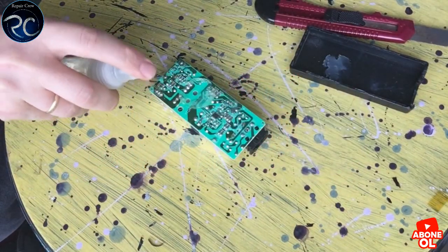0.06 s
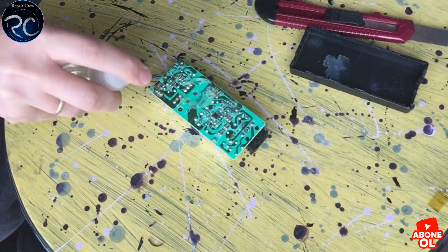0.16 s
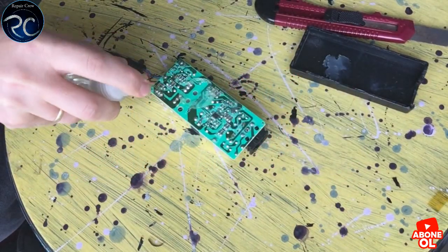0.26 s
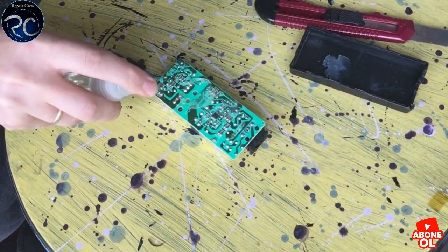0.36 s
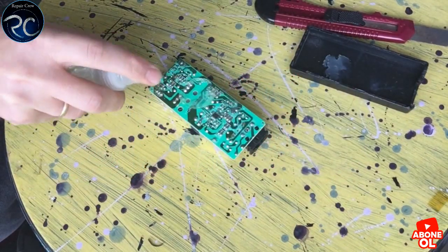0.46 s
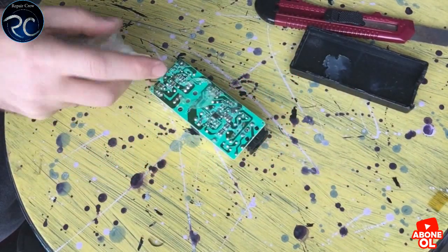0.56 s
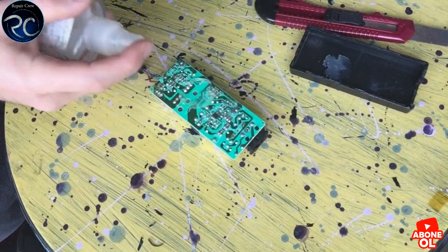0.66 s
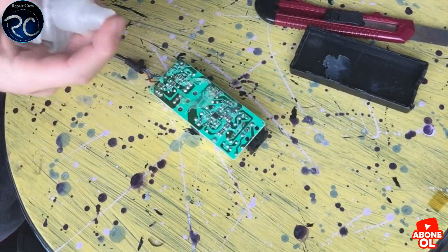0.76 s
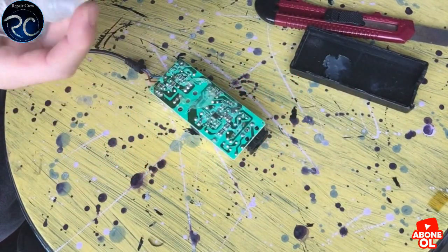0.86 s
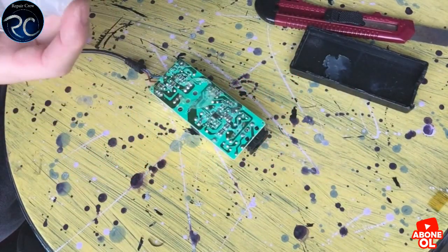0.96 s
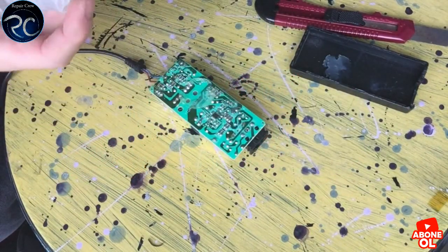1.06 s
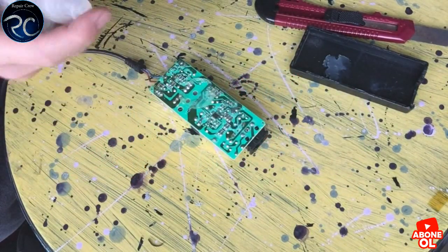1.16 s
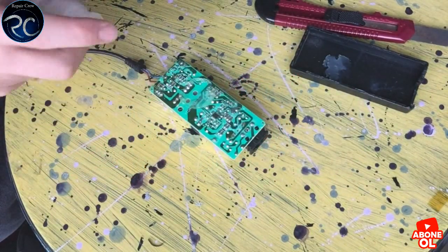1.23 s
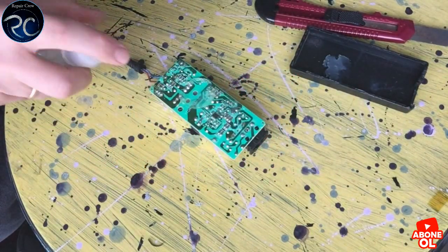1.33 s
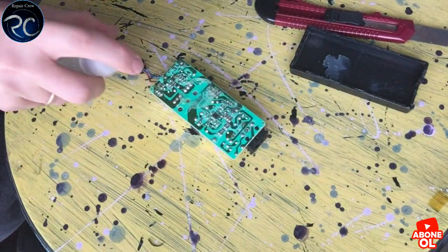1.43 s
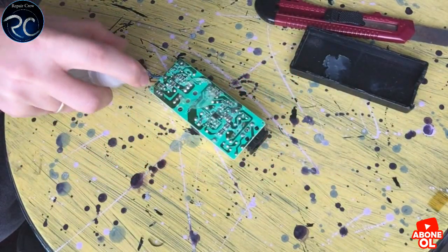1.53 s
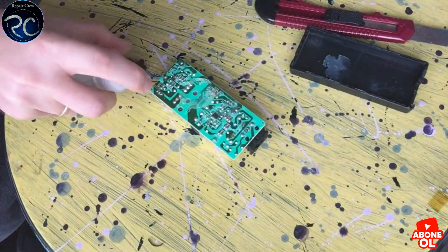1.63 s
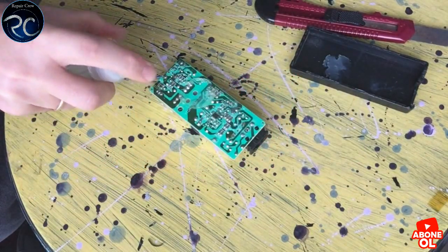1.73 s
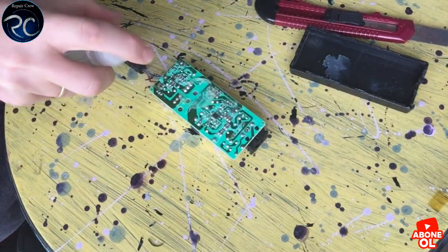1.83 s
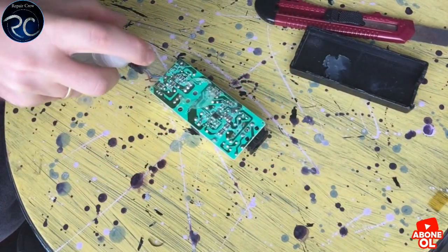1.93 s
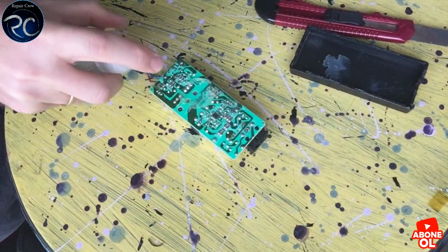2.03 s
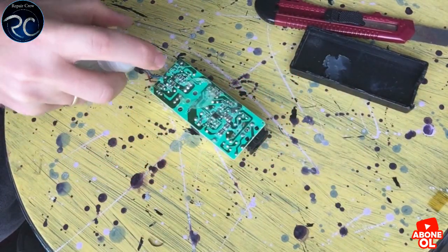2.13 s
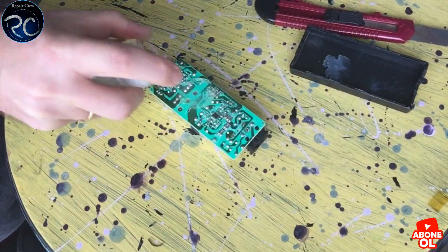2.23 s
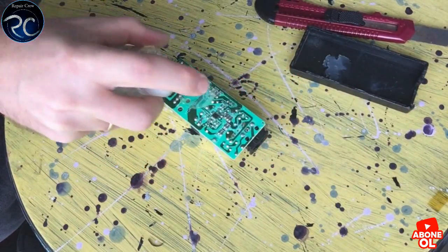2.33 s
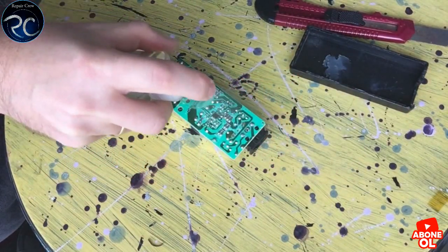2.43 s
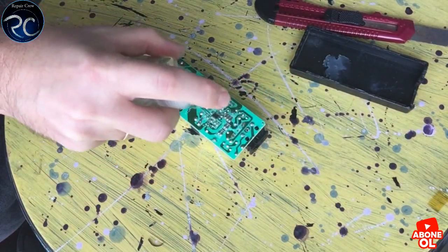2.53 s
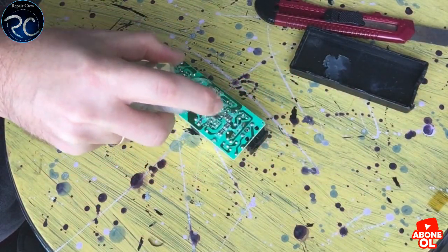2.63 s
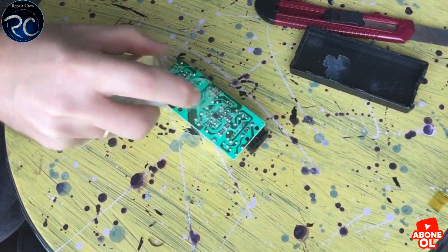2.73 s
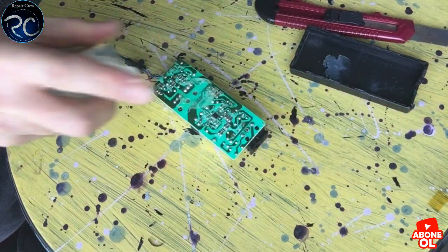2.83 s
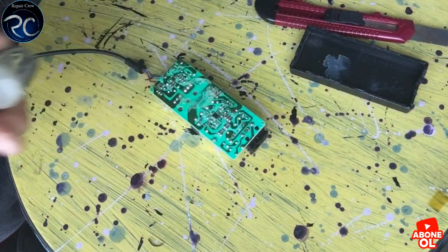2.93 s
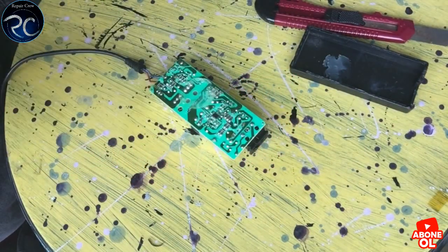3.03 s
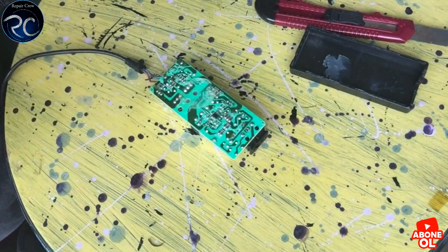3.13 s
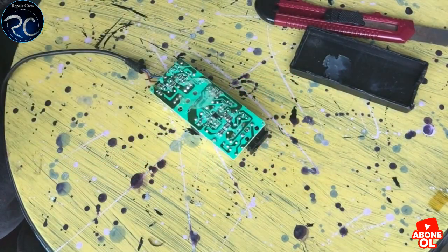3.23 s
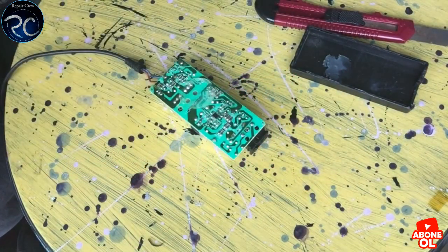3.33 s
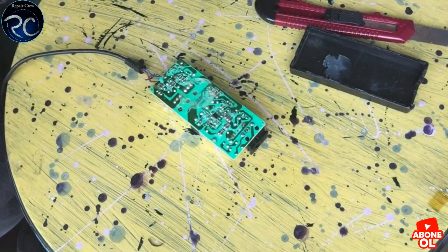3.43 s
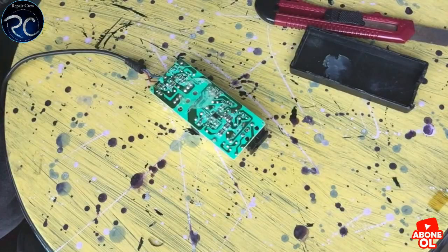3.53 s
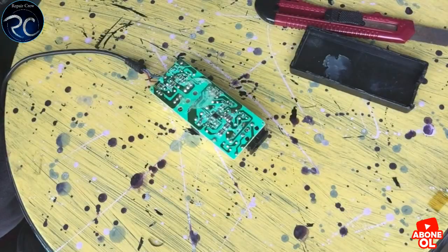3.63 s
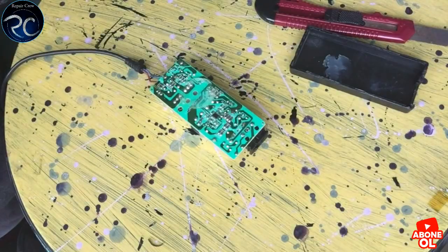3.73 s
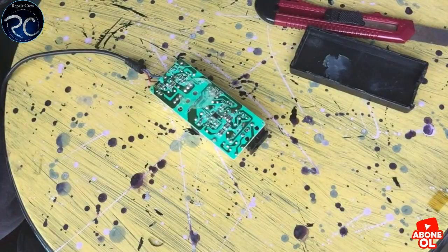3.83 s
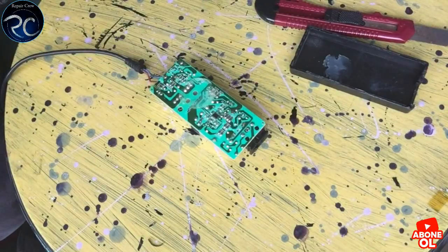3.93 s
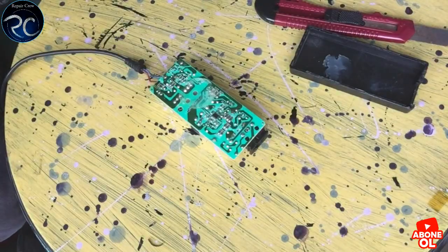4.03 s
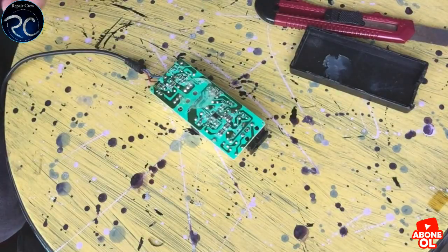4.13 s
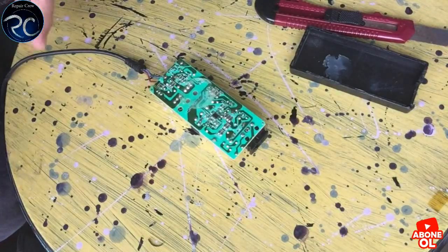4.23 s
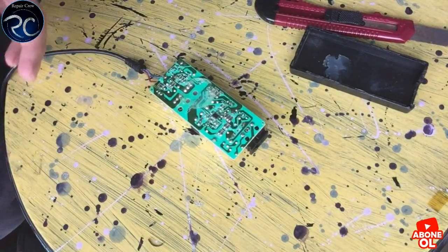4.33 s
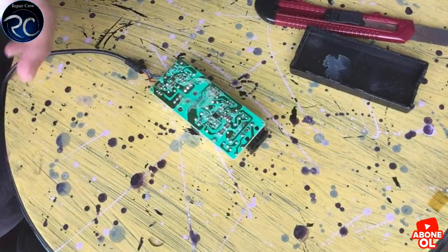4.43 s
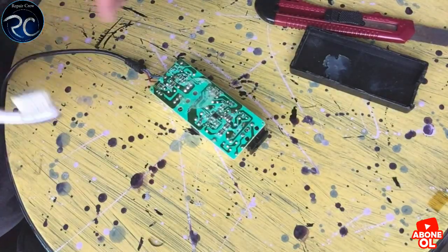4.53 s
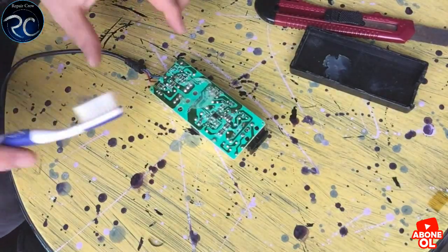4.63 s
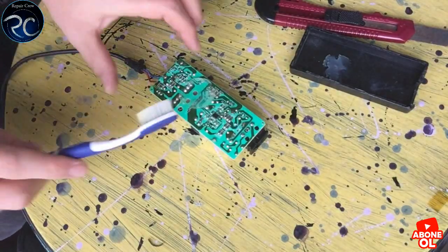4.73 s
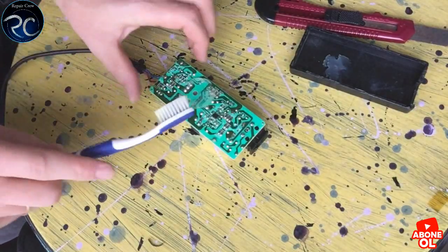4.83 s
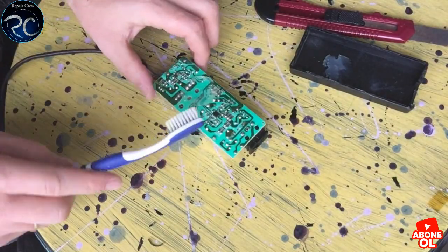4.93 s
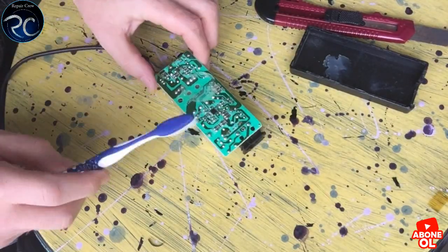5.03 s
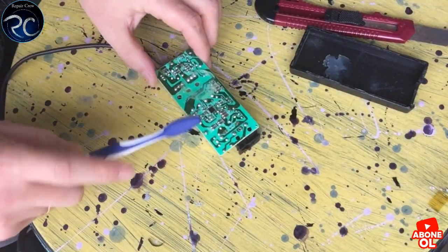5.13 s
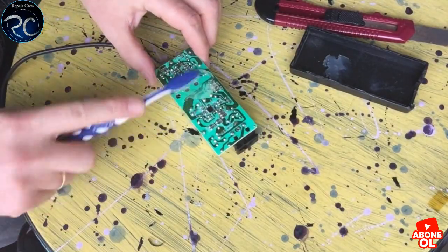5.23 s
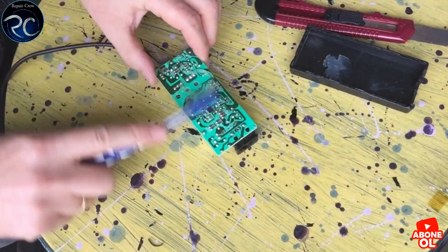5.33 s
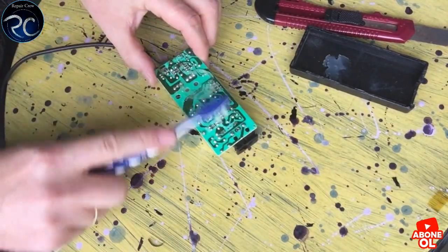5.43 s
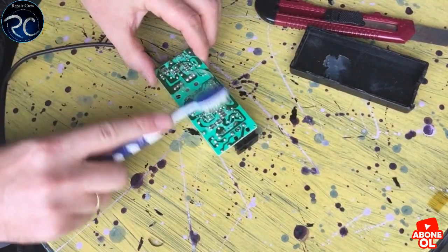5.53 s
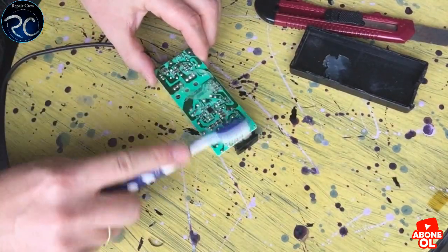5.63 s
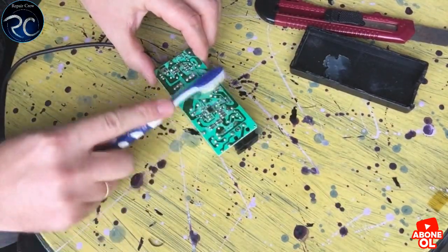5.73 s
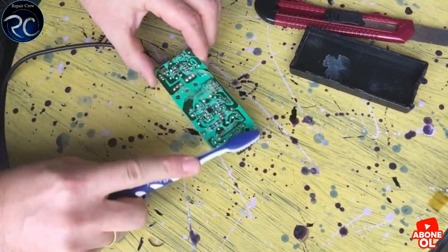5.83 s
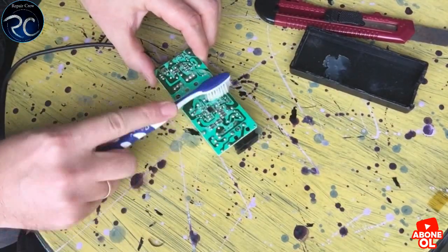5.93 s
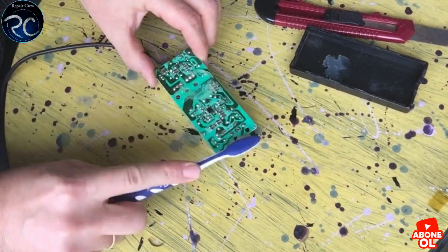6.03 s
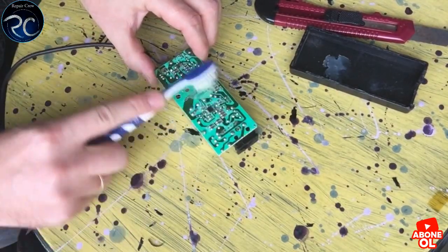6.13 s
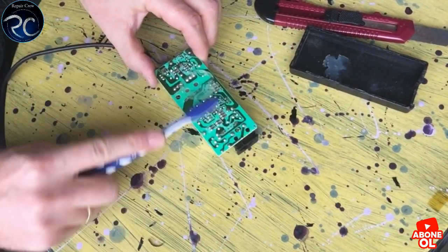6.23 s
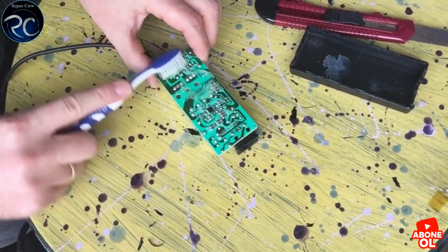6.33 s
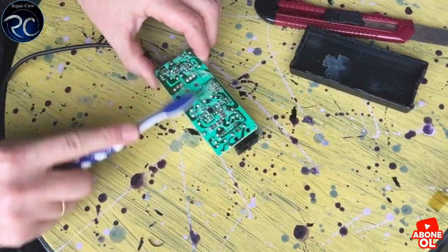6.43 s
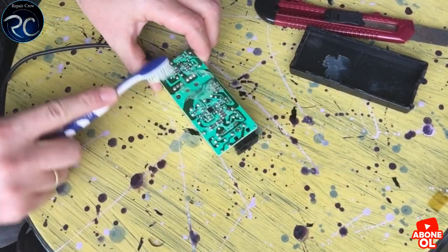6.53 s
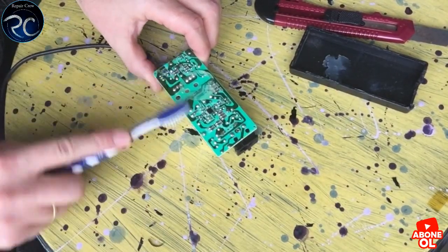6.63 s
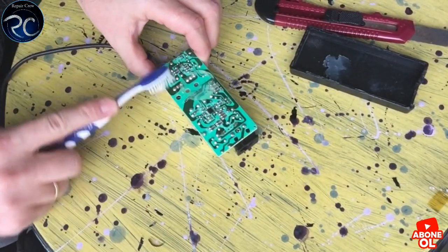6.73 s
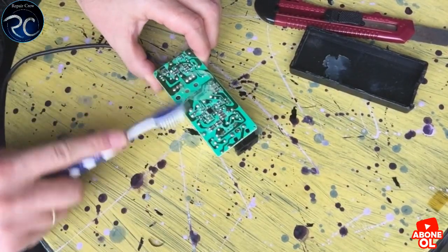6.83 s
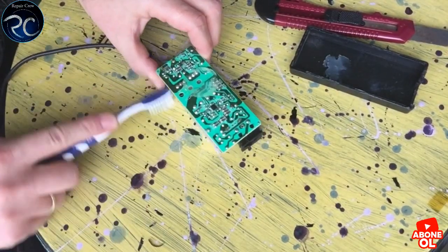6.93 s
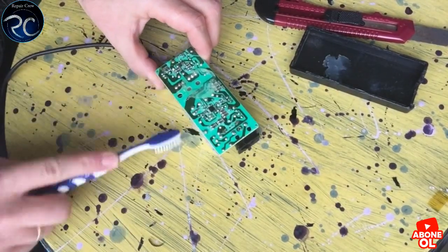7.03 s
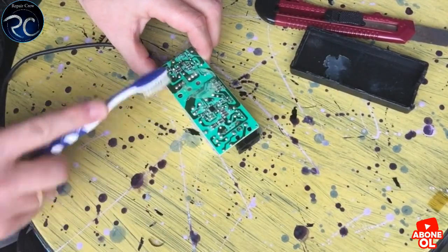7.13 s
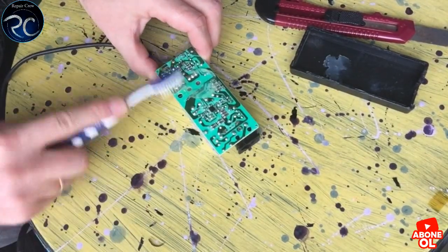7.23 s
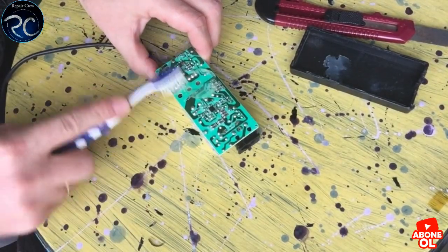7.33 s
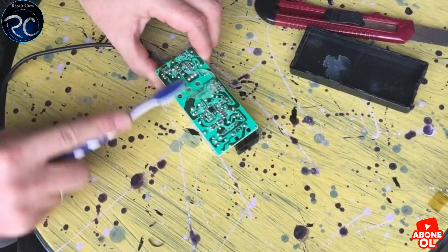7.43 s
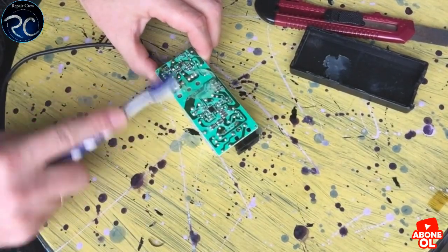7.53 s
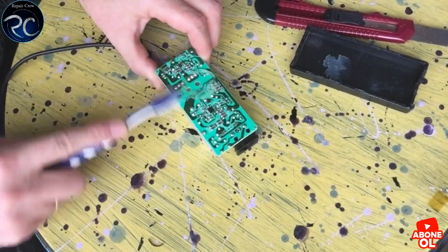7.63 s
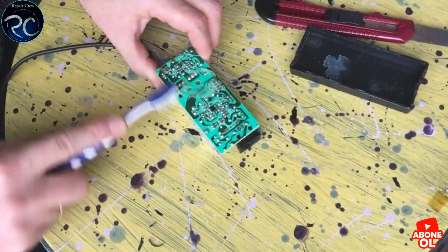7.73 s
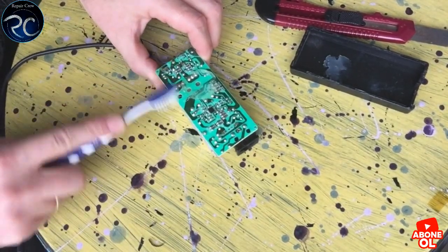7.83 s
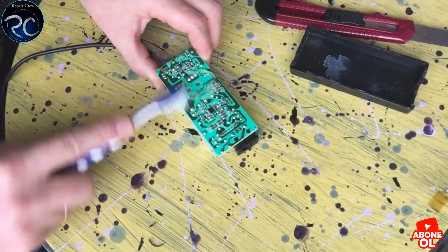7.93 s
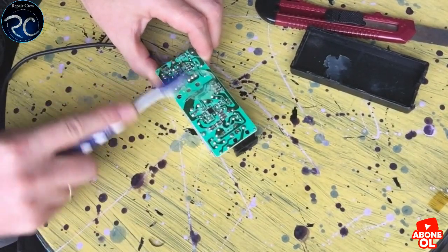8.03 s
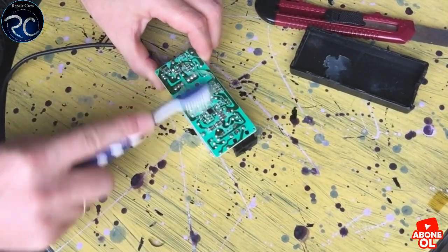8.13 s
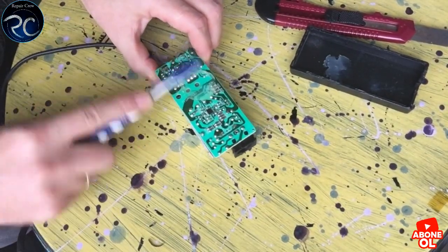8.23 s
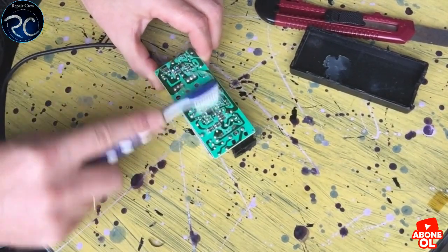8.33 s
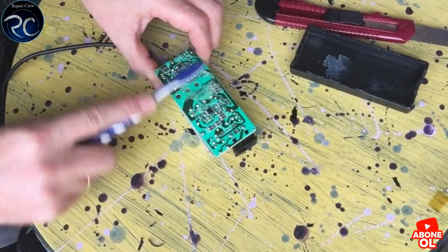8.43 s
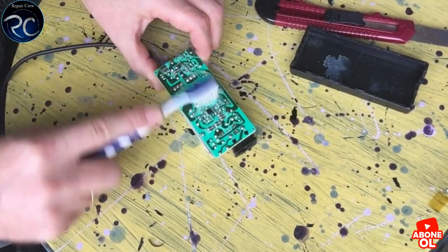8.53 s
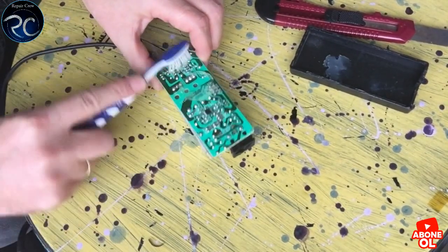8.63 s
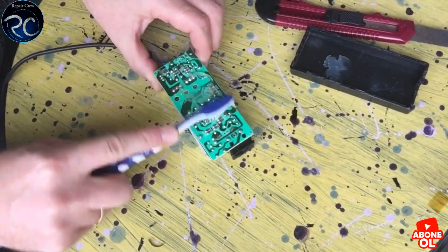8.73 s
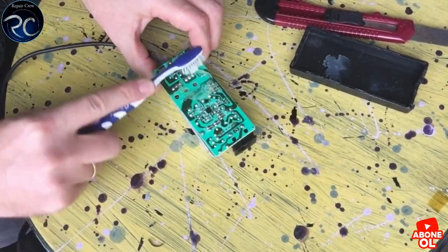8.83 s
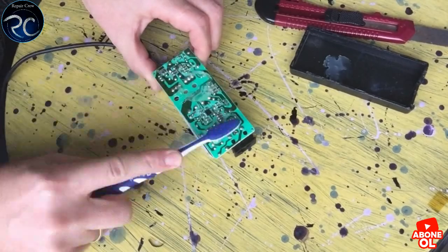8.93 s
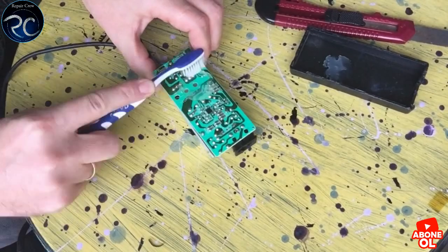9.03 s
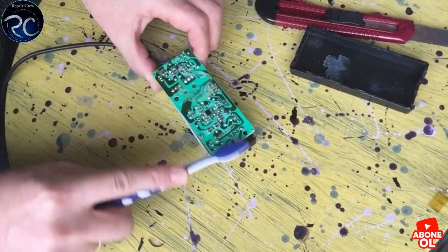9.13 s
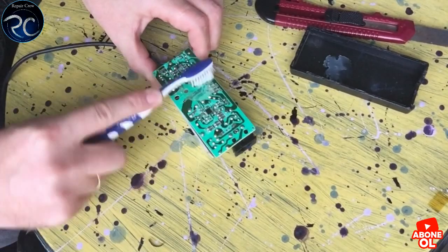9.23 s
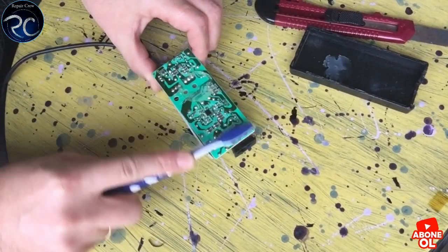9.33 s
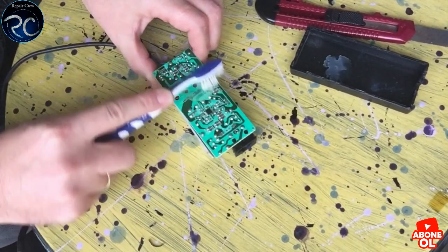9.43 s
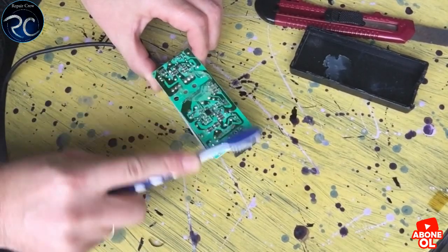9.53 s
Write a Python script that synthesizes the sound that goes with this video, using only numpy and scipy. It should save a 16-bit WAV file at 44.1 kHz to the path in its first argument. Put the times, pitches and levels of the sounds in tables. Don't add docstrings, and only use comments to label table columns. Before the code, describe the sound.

A small quiet room with faint unsteady hum, soft air noise and barely audible ticks, heard by a phone microphone close to a wooden bench. From 0.1 to 0.4 s a plastic spray pump clicks faintly with one short puff. Sparse tiny clicks follow; from 1.4 to 2.8 s they thicken, with wall crackle and five brief mist puffs, ending in a sharper tap on the board at 2.8 s. Near silence, then the bottle lands with a low woody thud at 3.9 s. At 4.9 s a brush is laid down and dragged. From 5.3 s it scrubs rapidly, about ten scratchy strokes a second, with tufts snapping and the board knocking, until a clattering skid around 6.9 s. After a short gap, a firmer bout runs from 7.2 s to the end at about 9.5 s, with hard slaps at 7.7 and 8.2 s and the loudest crack at 8.6 s.

```python
import sys
import numpy as np
from scipy import signal
from scipy.fft import rfft, irfft, next_fast_len
from scipy.io import wavfile
from scipy.ndimage import uniform_filter1d, map_coordinates

SR = 44100
rng = np.random.default_rng(int(sys.argv[2]) if len(sys.argv) > 2 else 0)


def level_to_linear(level):
    exponent = np.asarray(level, float) / 20
    return 10 ** exponent


def to_wav(sig):
    pcm = np.clip(np.atleast_2d(sig), -1, 1) * 32767
    pcm = np.round(pcm).astype(np.int16)
    wavfile.write(sys.argv[1], SR, pcm.T)


N = 422037

# start_s, speed_db, board_flex_db, bench_load_db
PLACING = [
    (4.906, -49.0, -44.0, -36.5),
    (5.04, -68.5, -59.5, -46.5),
]
# turn_s, speed_db, board_flex_db, bench_load_db
FIRST_BOUT = [(5.294, -45.0, -65.0, -43.5), (5.401, -43.5, -48.5, -48.0), (5.516, -41.5, -46.0, -39.5),
              (5.624, -50.0, -51.0, -44.5), (5.737, -46.0, -44.0, -49.5), (5.845, -48.5, -49.0, -44.0),
              (5.96, -41.5, -42.0, -40.5), (6.05, -46.0, -47.0, -48.5), (6.196, -43.0, -63.5, -40.5),
              (6.255, -45.0, -45.5, -45.5), (6.375, -45.5, -59.0, -42.5), (6.48, -44.0, -43.5, -39.0),
              (6.587, -45.5, -42.0, -49.0), (6.68, -44.0, -58.5, -39.0), (6.78, -41.0, -40.5, -41.5),
              (6.938, -54.0, -44.0, -46.5)]
# frequency_hz, level_db (per Hz)
SCRATCH = [(600, -79), (900, -19.5), (1100, -10), (1300, -12), (1650, -4.5), (2050, -3.5), (2300, -6.5),
           (2750, 3), (3200, -9), (3800, -14.5), (4400, -28.5), (4900, -26.5), (5600, -31), (6700, -41.5)]
# frequency_hz, width_hz, level_db
PLATE = [(2092, 64, -1.5), (2713, 110, 5), (2966, 30, -1.5), (1763, 75, 6), (1432, 20, 3.5)]
# frequency_hz, level_db (per Hz)
WOOD = [(65, -41), (110, -13), (150, -12.5), (194, 5.5), (226, -6), (258, -2), (290, -14), (352, -15),
        (404, -19.5), (520, -27.5), (680, -39), (1140, -120)]
# frequency_hz, level_db (per Hz)
PLASTIC = [(500, -69), (900, -10), (1400, -19.5), (1750, -5.5), (2250, -13), (2650, -1), (3100, -6.5),
           (3600, -13), (4300, -25), (5200, -23.5), (6500, -73), (8500, -49), (11000, -99)]


def unit(x):
    return x / np.sqrt(np.mean(x ** 2) + 1e-20)


def colour(points):
    f, db = np.transpose(points)
    grid = np.fft.rfftfreq(2 ** 14, 1 / SR)
    gain = level_to_linear(np.interp(np.log(grid + 1), np.log(f + 1), db))
    cep = irfft(np.log(np.maximum(gain, 1e-5)))
    cep[1:len(cep) // 2] *= 2
    cep[len(cep) // 2 + 1:] = 0
    kernel = irfft(np.exp(rfft(cep)))
    return lambda hz: rfft(kernel, 2 * len(hz) - 2)


def modes(table):
    def response(f):
        total = 0
        for k, (centre, width, db) in enumerate(table):
            damping = 1j * f * width
            total = total + (-1) ** k * level_to_linear(db) * damping / (centre * centre - f * f + damping)
        return total
    return response


def lifted(table):
    return lambda hz: 1 + modes(table)(hz)


def favoured(centre_hz, width_hz, lift_db):
    return lifted([(centre_hz[:, None], width_hz, lift_db)])


def filtered(x, *responses):
    n = x.shape[-1]
    m = 2 * next_fast_len(n // 2 + 1536)
    spectrum = rfft(x, m)
    for response in responses:
        spectrum = spectrum * response(np.fft.rfftfreq(m, 1 / SR))
    return irfft(spectrum, m)[..., :n]


def wobble(rate):
    knots = rng.standard_normal(int(N * rate / SR) + 4)
    return map_coordinates(knots, [np.arange(N) * rate / SR])


def grit(per_second, spread_db):
    there = rng.random(N) < per_second / SR
    return there * level_to_linear(spread_db * rng.exponential(size=N)) * rng.standard_normal(N)


def patchy(x, depth_db):
    z = signal.stft(x, nperseg=512)[2]
    field = uniform_filter1d(rng.standard_normal(z.shape), size=4, axis=0)
    field = uniform_filter1d(field, size=6, axis=1)
    return signal.istft(z * level_to_linear(depth_db * unit(field)), nperseg=512)[1][:N]


def strikes(times, peak_db, t60, spike, rise, *responses):
    t = np.arange(SR // 6) / SR
    rattle = level_to_linear(-60 * t / np.clip(t60, .01, .4)[:, None])
    shape = (1 - np.exp(-t / rise)) * (rattle + spike * level_to_linear(-60 * t / 0.0061))
    rings = filtered(shape * rng.standard_normal(shape.shape), *responses)
    rings *= (level_to_linear(peak_db) / np.abs(rings).max(axis=1))[:, None]
    at = np.round(times * SR).astype(int)[:, None] + np.arange(len(t))
    return np.bincount(at.ravel(), rings.ravel(), N + SR)[:N]


def brush():
    # turn_s, speed_db, board_flex_db, bench_load_db
    second_bout = [(7.205, -46.0, -58.0, -36.0), (7.303, -43.5, -62.5, -47.0), (7.398, -42.5, -54.5, -39.5),
                   (7.494, -42.5, -44.5, -39.5), (7.59, -41.5, -50.5, -34.5), (7.687, -39.0, -39.0, -40.5),
                   (7.797, -46.0, -54.5, -51.0), (7.892, -43.0, -54.0, -39.5), (8.005, -42.5, -41.5, -46.5),
                   (8.097, -42.0, -59.5, -43.5), (8.203, -39.5, -55.0, -55.5), (8.314, -41.5, -44.5, -37.5),
                   (8.415, -41.5, -48.0, -46.5), (8.508, -42.0, -50.5, -40.0), (8.618, -36.5, -51.5, -45),
                   (8.732, -50.5, -53.0, -48.0), (8.843, -40.0, -47.0, -48.0), (8.95, -45.5, -54.0, -39.0),
                   (9.048, -41.0, -45.0, -42.0), (9.156, -46.5, -55.0, -48.0), (9.258, -43.5, -54.5, -50.5),
                   (9.354, -46.0, -57.0, -45.5), (9.47, -40.0, -47.5, -44.0)]
    # frequency_hz, level_db (per Hz)
    hiss_colour = [(4500, -71), (6300, -14), (7000, -8), (7600, 1.5), (8600, 1), (9600, -7), (10400, -10),
                   (11200, -13), (13000, -26), (15000, -20)]
    # frequency_hz, width_hz, level_db
    bending = [(663, 88, 6.5), (797, 60, -4.5), (637, 60, -9), (1090, 160, -13)]
    speed_up_share, speed_up_most_s = .42, .062
    hiss_under_scratch_db, drying_db_per_s = -28.5, .8

    turn, scratch_db, board_db, bench_db = np.transpose(PLACING + FIRST_BOUT + second_bout)
    stroke_s = np.diff(turn, append=N / SR)
    fastest = turn + np.minimum(speed_up_share * stroke_s, speed_up_most_s)
    flicking = fastest >= FIRST_BOUT[0][0]
    drying_db = drying_db_per_s * (fastest - fastest.mean())
    hiss_db = np.where(flicking, scratch_db + hiss_under_scratch_db + drying_db, -99)

    start = np.maximum(turn, fastest - .075)
    end = np.minimum(np.append(turn[1:], N / SR + .01), fastest + 0.11)
    t, count = np.arange(N) / SR, np.arange(len(turn))
    moments = np.ravel([start, fastest, end - 1e-4], "F")
    travel = np.interp(t, moments, np.ravel([count, count + .5, count + 1], "F"))
    speed = uniform_filter1d(np.abs(np.sin(np.pi * travel)), size=300)
    pressed = np.interp(t, fastest, np.gradient(turn) < .125, 0)

    def level(db, drag, power):
        return level_to_linear(np.interp(t, fastest, db)) * (drag * pressed + np.abs(speed) ** power)

    shared = wobble(70)
    flicks = patchy(level_to_linear(1.25 * shared) * grit(3000, spread_db=2.0), depth_db=4.2)
    scratch = unit(filtered(flicks, colour(SCRATCH + [(8500, -89.5)]), lifted(PLATE)))
    fine_flicks = level_to_linear(2.6 * shared + 1.5 * wobble(200)) * grit(9000, spread_db=2.2)
    hiss = unit(filtered(fine_flicks, colour(hiss_colour)))
    pushes = patchy(level_to_linear(3.5 * wobble(40)) * grit(1500, spread_db=2.0), depth_db=3.5)
    board = unit(filtered(pushes, modes(bending), modes([(700, 800, 0)])))
    load = level_to_linear(3.0 * wobble(25)) * grit(3000, spread_db=2.0)
    wood = unit(filtered(load, colour(WOOD)))

    out = level(scratch_db - 6.5, drag=0.2, power=1.2) * scratch
    out += level(hiss_db - 3.5, drag=0.048, power=1.36) * hiss
    out += level(board_db - 7, drag=0.16, power=0.65) * board
    return out + level(bench_db - 3.5, drag=0.24, power=0.85) * wood


def tufts():
    # start_s, peak_db, ring_hz
    catches = [(5.3053, -47, 2030), (5.3358, -39, 2510), (5.4614, -35, 2900), (5.5744, -34, 2880),
               (5.6336, -46, 2060), (5.6625, -44, 2060), (5.687, -40, 2780), (5.7603, -31, 3000),
               (5.8501, -43, 2740), (5.888, -42, 1780), (5.9933, -32, 2040), (6.0716, -45, 3080),
               (6.0921, -42, 2770), (6.1554, -41, 2790), (6.2168, -37, 2080), (6.2846, -31, 2150),
               (6.4038, -42, 2820), (6.4248, -39, 2070), (6.4444, -36, 2850), (6.6268, -34, 2850),
               (6.6722, -33, 2150), (6.793, -38, 2650), (6.8254, -33, 2040),
               (7.0888, -55, 2780), (7.1057, -58, 2290), (7.1222, -55, 2740), (7.1392, -56, 2820),
                      (7.2255, -37, 2760), (7.2335, -33, 2850), (7.3093, -35, 2550), (7.3272, -33, 2670),
                      (7.4155, -37, 2880), (7.447, -35, 2400), (7.4694, -37, 2450), (7.5108, -34, 2540),
                      (7.5388, -37, 2660), (7.5627, -37, 2870), (7.6036, -40, 2790), (7.6321, -32, 2900),
                      (7.7538, -39, 2750), (7.8111, -40, 2890), (7.8735, -35, 2850), (7.9099, -37, 2430),
                      (7.9453, -38, 2590), (7.9668, -35, 2800), (8.0361, -35, 2990), (8.104, -41, 2670),
                      (8.1229, -39, 2550), (8.3225, -36, 2790), (8.3629, -37, 2870), (8.522, -38, 2500),
                      (8.5624, -36, 2640), (8.5904, -37, 2760), (8.6944, -38, 3010), (8.7695, -40, 2670),
                      (8.7959, -39, 2990), (8.8867, -36, 2850), (8.9989, -41, 2860), (9.0204, -38, 2840),
                      (9.1681, -44, 2780), (9.2184, -40, 2820), (9.2878, -37, 2880), (9.3761, -43, 3000)]
    s, db, hz = np.transpose(catches)
    t60, rise_s = np.full(len(s), .055), .003
    ring = favoured(hz, width_hz=300, lift_db=12)
    return strikes(s, db - 4, t60, .6, rise_s, colour(SCRATCH + [(8500, -89.5)]), ring)


def knocks():
    # start_s, peak_db
    small_parts = [(4.927, -40.5), (5.058, -47), (5.2488, -46), (5.7493, -33), (6.12, -34.5), (6.4926, -32),
                   (6.5974, -33), (6.691, -36.5), (6.8547, -25), (6.8936, -29), (6.9223, -21.5),
                   (7.167, -42), (8.001, -37), (8.217, -30.5), (8.4245, -30), (8.6375, -14), (9.0696, -37),
                   (9.4802, -29)]
    # start_s, peak_db
    large_parts = [
        (2.785, -20.5),
        (5.4316, -32),
        (5.534, -31.5),
        (5.9696, -30),
        (6.2421, -29.5),
        (7.6693, -28.5),
        (7.6989, -25.5),
        (8.8568, -40.5),
    ]
    # frequency_hz, level_db (per Hz)
    crack_colour = [(500, -71), (950, -9.5), (1300, -15), (1800, 1), (2200, 0.5), (2800, 2.5), (3300, -7.5),
                    (3900, -21), (4500, -27), (5200, -36), (6500, -63), (8000, -45), (11000, -74)]
    # start_s, peak_db
    glance_at = (7.365, -21)
    # frequency_hz, level_db (per Hz)
    snap_colour = [(300, -30), (600, -6), (1200, -16), (2000, -3), (2700, 0), (3500, -11), (4300, -27),
                   (5500, -28), (7500, -50), (11000, -75)]
    rattle_t60 = [.13, .075]

    s, db = np.transpose(small_parts + large_parts)
    in_first_bout = (s > PLACING[0][0]) & (s < FIRST_BOUT[-1][0])
    t60 = np.where(in_first_bout, *rattle_t60)
    hz = np.repeat([2760, 2000], [len(small_parts), len(large_parts)])
    spot = favoured(hz, width_hz=300, lift_db=3.5)
    cracks = strikes(s, db, t60, 3.2, 0.0004, colour(crack_colour), lifted(PLATE), spot)
    s, db = glance_at
    return cracks + strikes(np.array([s]), db, np.array([.02]), 3, .0004, colour(snap_colour))


def slaps():
    # start_s, peak_db, bench_thud_db (re peak)
    edge_slaps = [(4.884, -60, 17), (5.059, -47, 3), (5.257, -40, 3), (5.324, -27, -10),
                  (5.530, -27.5, -10), (5.7445, -28, -8), (5.967, -35, -9), (6.123, -40, 5.5),
                  (6.22, -27.5, -16), (6.495, -45, 11), (6.68, -26, -14), (7.17, -45, 2), (7.24, -52, 22),
                  (7.365, -28.5, -8), (8.142, -33.5, 2.5), (8.329, -38, -9), (8.436, -39.5, 2),
                  (9.087, -35, -14), (9.478, -46, 9)]
    # start_s, peak_db, bench_thud_db (re peak)
    flat_slaps = [
        (4.934, -35, -3),
        (6.246, -32, 2),
        (6.538, -36, -10),
        (7.711, -24, -6),
        (6.602, -34.5, -5),
        (7.587, -35.5, -13),
        (8.005, -25, -3.5),
        (8.22, -20.5, -4),
        (8.641, -12, -15),
        (8.8, -33.5, -1.5),
    ]
    # start_s, peak_db, bench_thud_db (re peak)
    shoves = [
        (6.874, -25, 2),
        (6.9, -23.5, -7.5),
    ]
    # frequency_hz, level_db (per Hz)
    edge_colour = [(120, -30), (250, -4), (340, 0), (500, -5), (700, -8), (1100, -17), (1600, -32),
                   (3000, -70)]
    # frequency_hz, width_hz, level_db
    slap_modes = [(691.5, 89, 3), (333, 73, -3), (726, 60, -1.5), (1134, 200, -18.5)]
    shove_t60_s = .17

    s, db, thud_db = np.transpose(edge_slaps + shoves[:1])
    t60 = np.repeat([.065, shove_t60_s], [len(edge_slaps), 1])
    out = strikes(s, db, t60, 9, .0008, colour(edge_colour))
    out += strikes(s, db + thud_db, t60, 3, 0.0021, colour(WOOD))

    s, db, thud_db = np.transpose(flat_slaps + shoves[1:])
    t60 = np.repeat([.05, shove_t60_s], [len(flat_slaps), 1])
    flat_ring = lifted([(690, 133, 11.5)])
    out += strikes(s, db - 3.5, t60, 4.7, 0.00078, modes(slap_modes), modes([(634, 1600, 0)]), flat_ring)
    return out + strikes(s, db + thud_db, t60, 3, 0.0021, colour(WOOD))


def pump_clicks():
    # start_s, peak_db, thud_db (re peak)
    head_clicks = [(.1175, -48.5, -22), (.1796, -40.5, -10.5), (.2908, -50, -2.5), (.3484, -50.5, -14),
                   (.9145, -48, -19), (1.2234, -52, -20), (1.4805, -50.5, 1), (1.6405, -45.5, -2.5),
                   (1.6611, -43.5, -25), (1.8214, -35.5, -21), (1.9617, -41, -6.5), (1.995, -42, -25),
                   (2.1012, -35.5, -18.5), (2.1455, -37, -12), (2.2418, -36.5, -3.5), (2.2663, -50, -6),
                   (2.2865, -42.5, -13), (2.3425, -36.5, -19), (2.3843, -44, -7), (2.4583, -38, -18),
                   (2.4832, -30, -10), (2.588, -37.5, -13.5), (2.6632, -39, -20), (2.7446, -27.5, -12),
                   (2.908, -51, -4), (3.345, -60, 6), (3.5314, -55.5, -7), (3.8782, -39, 8.5)]
    # start_s, peak_db, thud_db (re peak)
    wall_clicks = [
        (1.4138, -38, -32),
        (2.6352, -40.5, -13.5),
    ]
    # frequency_hz, level_db (per Hz)
    thud_colour = [(71, -45), (120, -15), (225, -1), (363, 0), (641, -10), (926, -12), (1300, -21.5),
                   (1690, -42.5), (2860, -120)]
    s, db, thud_db = np.transpose(head_clicks + wall_clicks)
    hz = np.repeat([2860, 1950], [len(head_clicks), len(wall_clicks)])
    hz = hz * (1 + .05 * rng.standard_normal(len(s)))
    t60 = .06 - .0013 * thud_db
    out = strikes(s, db, t60, 4.7, 0.00054, colour(PLASTIC), favoured(hz, width_hz=370, lift_db=6.5))
    return out + strikes(s, db + thud_db + 3.0, 0.84 * t60, 5.1, 0.00061, colour(thud_colour))


def mist():
    # start_s, length_s, softness (of the push, 0-1), rush_db, fizz_db
    puffs = [
        (0.177, .12, 0.27, -54, -72),
        (1.504, .1, .8, -52.5, -73.5),
        (1.864, 0.15, 0.43, -55.5, -76.5),
        (2.149, 0.11, 0.4, -55.5, -78),
        (2.377, 0.12, 0.73, -58.5, -81),
        (2.644, 0.11, 0.6, -55.5, -81),
    ]
    # frequency_hz, level_db (per Hz)
    rush_colour = [(250, -70), (450, -39), (700, -14), (1300, -11.5), (1600, -15), (2000, -10.5),
                   (2300, -9), (2900, -1), (3500, -11), (4200, -23.5), (5200, -29), (6000, -32),
                   (6900, -37)]
    fizz_colour = [(5000, -77), (6600, -13), (7200, 0), (8000, 9), (9000, 9), (10000, -1), (10700, -3),
                   (12500, -11), (15000, -18)]
    # frequency_hz, width_hz, level_db
    nozzle = [(3053, 48, 1), (2530, 77, 2.5)]
    t, out = np.arange(N) / SR, np.zeros(N)
    spurts = patchy(grit(6000, spread_db=1.5), depth_db=3.5)
    rush = unit(filtered(spurts, colour(rush_colour + [(8500, -91)]), lifted(nozzle)))
    droplets = level_to_linear(2.5 * wobble(130)) * grit(9000, spread_db=2.4)
    fizz = unit(filtered(droplets, colour(fizz_colour)))
    for start, length, softness, rush_db, fizz_db in puffs:
        during = (t > start) & (t < start + length)
        u = (t[during] - start) / length
        flow = np.sin(np.pi * u ** softness).clip(0) ** 1.06
        out[during] += flow * (level_to_linear(rush_db) * rush[during] + level_to_linear(fizz_db) * fizz[during])
    return out


def crackle():
    # start_s, peak_db, ring_hz
    bursts = [(0.0882, -57, 2810), (0.188, -43, 2830), (0.3177, -50, 2780), (0.3974, -59, 2870),
              (0.6025, -61, 2980), (0.9294, -57, 2870), (1.1204, -56, 2720), (1.513, -48, 2610),
              (1.5259, -45, 2930), (1.5449, -43, 2970), (1.5623, -43, 2670), (1.7714, -55, 2750),
              (1.8677, -48, 2610), (1.8926, -46, 2480), (1.927, -47, 2980), (2.0344, -54, 2680),
              (2.167, -43, 2880), (2.1824, -43, 2850), (2.3524, -40, 3000), (2.4344, -40, 2660),
              (2.6963, -44, 3110), (2.7152, -45, 2670)]
    s, db, hz = np.transpose(bursts)
    ring = favoured(hz, width_hz=400, lift_db=4)
    return strikes(s, db - 1.5, np.full(len(s), .04), 1.5, .0012, colour(PLASTIC), ring)


def set_down():
    # start_s, level_db
    landing = (3.877, -28.5)
    # frequency_hz, level_db, t60_s
    landing_modes = [(157.4, -0.5, 0.19), (239, 2.5, 0.094), (306, 0, 0.11), (402, -12, 0.12),
                     (724, -9, 0.092), (1030, -6, 0.057), (1234, -10, 0.066)]
    s, db = landing
    t = np.arange(SR // 2) / SR
    ring = sum(level_to_linear(level - 60 * t / t60) * np.sin(2 * np.pi * hz * t) for hz, level, t60 in landing_modes)
    swell = 1 - np.exp(-t / 0.0045)
    ring = np.pad(level_to_linear(db) * swell * ring, (round(s * SR), N))[:N]
    rattle = colour([(200, -5.5), (1200, -8.5), (3400, -10), (4500, -24), (8000, -62)])
    return ring + strikes(np.array([s]), db - 8, np.array([.17]), 1.5, 0.0023, rattle)


def bench():
    # time_s, hum_db
    leaning = [
        [(1.475, -80), (1.49, -49.5), (1.55, -55.5), (1.62, -83)],
        [(3.95, -63), (4.02, -63), (4.07, -51.5), (4.12, -58.5), (4.16, -56), (4.25, -74), (4.33, -78)],
    ]
    # time_s, level_db
    rocking = [
        [(3.86, -66), (3.88, -55), (4.1, -72)],
        [(4.8, -69), (4.97, -61.5), (6.79, -56.5), (6.91, -42.5), (7.16, -71), (7.35, -53), (9.57, -62.5)],
    ]
    # frequency_hz, level_db (per Hz)
    shudder_colour = [(12, -28), (20, -15), (43, 1), (76, -9.5), (130, -3.5), (170, -37.5), (290, -120)]
    t = np.arange(N) / SR

    def envelope(tables):
        return sum(level_to_linear(np.interp(t, *np.transpose(rows), -120, -120)) for rows in tables)

    top = modes([(147, 44, 3.5), (189, 55, -1.5), (362, 120, -2)])
    wood = unit(filtered(rng.standard_normal(N), top, colour(WOOD)))
    shudder = unit(filtered(rng.standard_normal(N), colour(shudder_colour)))
    return level_to_linear(1.5) * envelope(leaning) * wood + envelope(rocking) * shudder


def walls(x):
    t = np.arange(SR // 4) / SR
    tail = rng.standard_normal(len(t)) * level_to_linear(-60 * t / 0.25) * (t > .006)
    return level_to_linear(-13.5) * signal.fftconvolve(x, tail / np.linalg.norm(tail))[:N]


def room():
    # frequency_hz, level_db (per Hz)
    air_colour = [(25, -8.5), (45, -0.5), (90, -1.5), (200, -5.5), (340, -14.5), (600, -17.5),
                  (1200, -21.5), (2000, -23), (2900, -17.5), (3700, -32), (4400, -34.5), (5500, -34.5),
                  (8000, -41), (14500, -49.5)]
    # frequency_hz, level_db (rms)
    mains = [(100, -70.5), (200, -71)]
    # start_s, peak_db
    ticks = [(.118, -64), (.18, -60), (.8889, -71), (1.287, -68), (1.8218, -55.5), (1.996, -59),
             (2.1006, -55), (2.266, -54), (2.5067, -57), (2.589, -50), (2.7636, -60), (2.785, -52),
             (2.845, -66), (2.851, -66), (3.1433, -70), (3.4431, -68), (3.8756, -57), (4.279, -70),
             (5.0948, -70), (6.901, -45.5)]
    beacon_slots = [0, 2, 3, 5, 6, 9, 11, 18, 21, 29, 32, 38, 40, 43, 44, 47, 50]
    beacon_first_s, beacon_period_s, beacon_db = .0897, .1024, -68

    t = np.arange(N) / SR
    out = level_to_linear(-63.5 + 0.69 * wobble(2.2)) * unit(filtered(rng.standard_normal(N), colour(air_colour)))
    for hz, db in mains:
        strength = np.sqrt(2) * level_to_linear(db + 1.5 * wobble(15))
        out += strength * np.sin(2 * np.pi * hz * t + 1.9 * wobble(4))
    beacon = [(beacon_first_s + beacon_period_s * k, beacon_db) for k in beacon_slots]
    s, db = np.transpose(ticks + beacon)
    narrow = modes([(5320, 900, 0)])
    return out + strikes(s, db, np.full(len(s), 0.01), 1.5, .0005, narrow, narrow)


def scene():
    sharp = tufts() + knocks() + slaps() + pump_clicks() + mist() + crackle() + set_down()
    return (brush() + sharp + bench() + walls(sharp) + room())[None]


def low_pass(x):
    return signal.sosfilt(signal.butter(12, 15100, fs=SR, output="sos"), x)


def record(dry):
    port = filtered(dry, lambda hz: 1 - 0.36 * modes([(10500, 700, 0)])(hz))
    squeezed = port / np.sqrt(np.sqrt(1 + (port / .24) ** 4))
    mix = port + filtered(squeezed - port, lambda hz: 1 / (1 + (hz / 4200) ** 8))
    return low_pass(mix)


dry = scene()
out = record(dry)
to_wav(out)
```